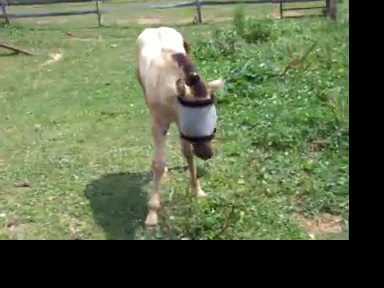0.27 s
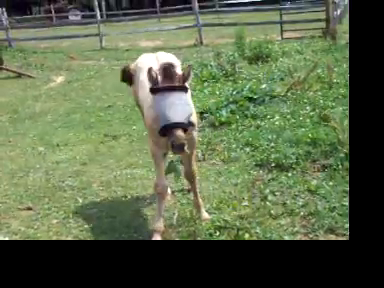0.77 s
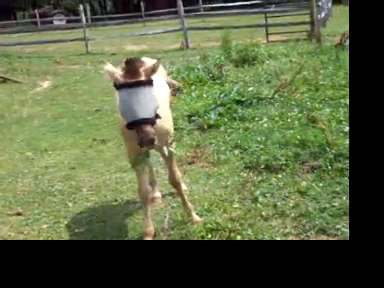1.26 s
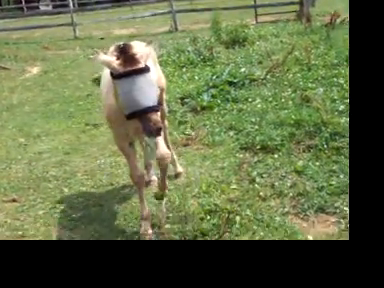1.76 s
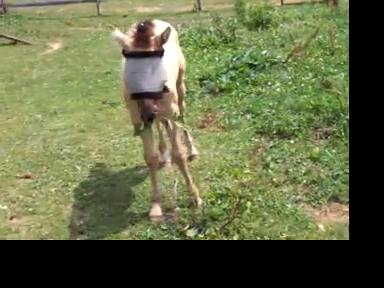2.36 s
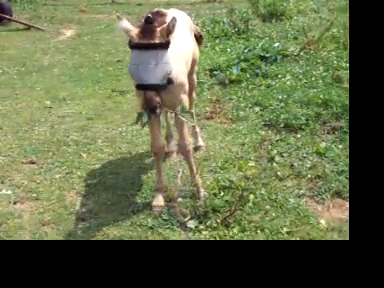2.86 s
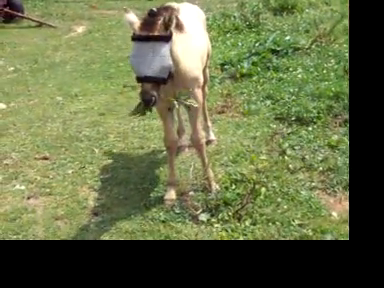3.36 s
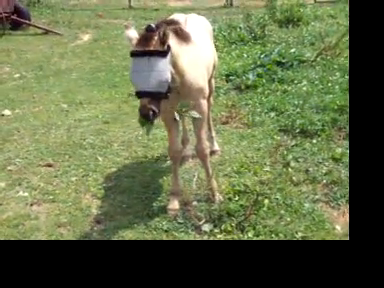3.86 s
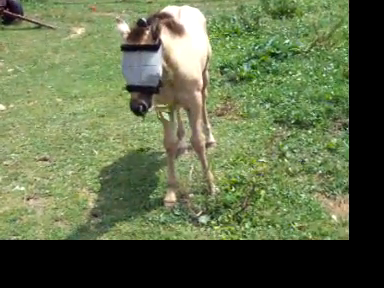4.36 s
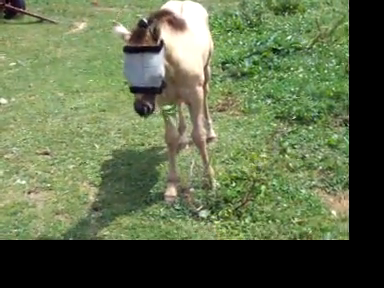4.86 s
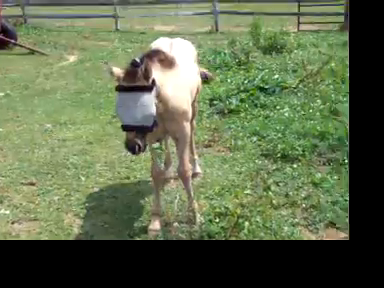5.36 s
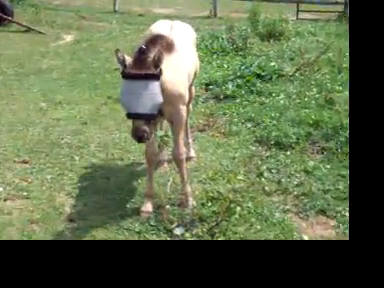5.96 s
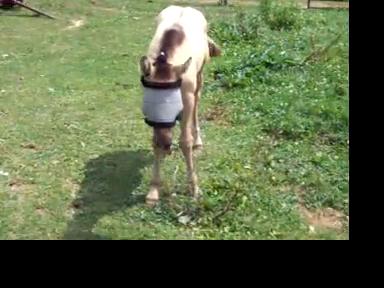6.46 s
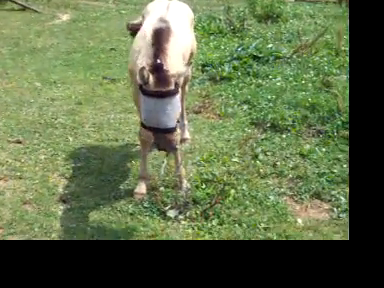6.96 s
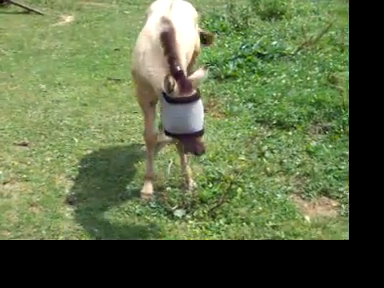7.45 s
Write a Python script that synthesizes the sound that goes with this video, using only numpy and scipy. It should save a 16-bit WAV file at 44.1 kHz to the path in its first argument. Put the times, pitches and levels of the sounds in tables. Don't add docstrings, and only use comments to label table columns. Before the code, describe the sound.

From the start, a camera's focus motor chatters right at the microphone: short rattling stepped buzzes ending in tiny clacks and thumps, in quick groups until about 0.9 s and again from 1.2 to 2.1 s, where a soft gear whirr from the zoom swells and fades. Small finger ticks follow, while leaves crackle faintly and birds give brief whistles and low coos around 2.5 to 3.2 s. The motor hunts once more at 3.4 to 3.7 s. A hard bright knock lands at 4.2 s, with a quiet bird trill from 4.3 to 4.8 s. Ticks and rustle gather near 5.4 s, then gripped plastic crunches loudly at 5.6 to 5.8 s. A fuller knock with a bounce comes at 6.0 s, scattered taps after, and a double tap at 7.2 s amid bird chirps. Thin insect tones, distant engine drone, ground rumble and air hiss continue to 7.7 s.

```python
import sys
import numpy as np
from scipy import signal
from scipy.fft import rfft, irfft, next_fast_len
from scipy.io import wavfile
from scipy.ndimage import uniform_filter1d

SR = 44100
rng = np.random.default_rng(int(sys.argv[2]) if len(sys.argv) > 2 else 0)


def gain_from_decibels(decibels):
    exponent = np.asarray(decibels, float) / 20
    return 10 ** exponent


def transcribe(signal):
    frames = np.atleast_2d(signal).T
    limited = np.clip(frames, -1, 1)
    pcm = np.round(limited * 32767).astype(np.int16)
    wavfile.write(sys.argv[1], SR, pcm)


N = 340893

# pitch in Hz, level in dB, time to die by 60 dB in seconds.
CASE_RINGS = [(381.3, -23.5, 0.29), (494, -20, 0.02), (568, -8.5, 0.051), (680, -15, 0.013),
              (910, -5.5, 0.015), (1033, -3, 0.025), (1250, -7.5, 0.012), (1560, -12.5, 0.011),
              (1835, -16, 0.01), (2157, -21, 0.028), (2450, -21, 0.025), (2730, -16, 0.0059),
              (3000, -21, 0.023), (3580, -17.5, 0.0083), (3950, -21, 0.018), (4460, -22, 0.01),
              (5770, -16, 0.012)]


def focus_motor(moves, lead_s, first_db, last_db, count):
    steps_per_s = 487.4
    start_s, peak_db, clack_db, thump_db = np.transpose(moves)[:, :, None]
    step = np.arange(count)
    at = np.round((start_s - lead_s + step / steps_per_s) * SR).astype(int)
    speeding_db = first_db * np.clip(1 - step / 3.34, 0, 1)
    speeding_db = speeding_db + last_db * np.clip(step / 3.28 - 1, 0, None)

    moving = np.zeros(N)
    moving[at] = gain_from_decibels(peak_db + 0.19 * speeding_db)
    rattle = uniform_filter1d(moving, size=100) * rng.standard_normal(N)
    out = gain_from_decibels(25.0) * band(rattle, 740, 6600)
    for k, (hz, level_db, t60) in enumerate(CASE_RINGS):
        heavy = np.clip(1.3 - hz / 4000, 0, 1)
        uneven_db = 2.0 * rng.standard_normal(at.shape)
        steps = np.zeros(N)
        steps[at] = gain_from_decibels(peak_db + heavy * speeding_db + uneven_db)
        rattle_db = 13.5 + 5.6 * (hz > 1200)
        out += gain_from_decibels(level_db) * ring((-1) ** k * steps + gain_from_decibels(rattle_db) * rattle, hz, t60)

    clacks, thumps = np.zeros((2, N))
    last = at[:, -1]
    clacks[last] = gain_from_decibels(peak_db + clack_db + 8.0)[:, 0]
    thumps[last] = gain_from_decibels(peak_db + thump_db + 7.0)[:, 0]
    clack = ring(clacks, 3840, 0.01) + 0.36 * ring(clacks, 2600, 0.0037) + 0.65 * ring(clacks, 1300, 0.004)
    thump = ring(thumps, 567, 0.046) + 0.14 * ring(thumps, 1015, 0.055) - 0.12 * ring(thumps, 400, 0.15)
    return out + clack + thump


# start of the first move in seconds, level above usual in dB.
HUNTS = [(0.114, -0.5), (0.364, 0.8), (0.614, 0.8), (1.313, 0.5), (1.611, 0.5), (1.861, 0.2), (3.459, .5)]
# seconds after the hunt starts, peak in dB, end-stop clack in dB, thump in dB.
SHORT_MOVES = [
    (0, -21, -13, -12),
    (.05, -23, -23, -5),
    (.1, -21, -16, -13),
]
LONG_MOVE = (.181, -22, -20, -13)
# start in seconds, peak in dB, clack in dB, thump in dB.
WAKE_MOVES = [
    (1.243, -23.5, -32, -8),
    (3.389, -23.5, -21, -8.5),
]
# start in seconds, peak in dB, clack in dB, thump in dB.
FIRST_MOVE = [(0.044, -22.5, -7, -11)]


def focus_hunts():
    short = focus_motor(sorted(hunted(SHORT_MOVES) + WAKE_MOVES), 0.0068, first_db=-27.0, last_db=-2.0, count=5)
    long = focus_motor(hunted([LONG_MOVE]), 0.008, first_db=-29.0, last_db=-3.5, count=10)
    first = focus_motor(FIRST_MOVE, 0.0053, first_db=-28, last_db=-11, count=13)
    return short + long + first


def hunted(moves):
    return [(s + after, db + peak_db, clack_db, thump_db)
            for s, db in HUNTS
            for after, peak_db, clack_db, thump_db in moves]


# time in seconds, level in dB.
ZOOM_LEVEL = [(1.42, -56), (1.58, -47), (1.66, -45), (1.74, -46), (1.84, -48), (1.97, -50), (2.14, -57.5),
              (2.25, -66)]
# pitch in Hz, level in dB per Hz.
ZOOM_COLOUR = [(150, -31), (250, -8.5), (636, -4), (853, -16.5), (2560, -12), (2720, -20), (5010, -22.5),
               (7000, -31), (9100, -54), (15400, -120)]
# pitch in Hz, width in Hz, level in dB.
ZOOM_GEARS = [(1225, 190, -4), (1570, 180, -4.5), (2418, 69, -8.5), (5000, 190, -10.5), (5840, 160, -17)]


def zoom_motor():
    white = rng.standard_normal(N)
    gears = sum(gain_from_decibels(db) * narrow_noise(hz, width_hz, white) for hz, width_hz, db in ZOOM_GEARS)
    whirr = coloured(white, ZOOM_COLOUR) + gears
    level_db = in_time(ZOOM_LEVEL, outside=-120)[0] + 5.0
    return gain_from_decibels(level_db + 0.83 * drift(30)) * whirr


# time in seconds, peak in dB, delay of the bounce in seconds, bounce in dB.
KNOCKS = [
    (4.179, -8, 0.003, -29),
    (6.0232, -11.5, 0.00128, -7),
    (7.2441, -24.5, 0.001175, 7),
    (6.8433, -24, .002, 0),
    (6.0697, -29, .001, -14),
    (2.4686, -27.5, 0.00146, -1),
]
# pitch in Hz, level in dB, time to die by 60 dB in seconds.
KNOCK_RINGS = [
    [(700, -17.5, 0.013), (1810, -13, 0.018), (2390, -11.5, 0.016), (3100, -8.5, 0.011),
     (3600, -9.5, 0.015), (4020, -2, 0.0076), (5400, 1, 0.0058), (6000, -2.5, 0.0067), (6660, -1.5, 0.0068)],
    [(680, -4, 0.018), (1240, -4, 0.012), (1940, -3.5, 0.012), (2600, -2.5, 0.014), (3400, -3.5, 0.01),
     (4230, 1.5, 0.009), (5200, -10, 0.0073), (6040, -16, .008)],
    [(955, -2.5, 0.012), (2010, -0.5, 0.016), (2830, -7, 0.014), (3380, -8, 0.011), (4040, -3, 0.011),
     (4640, -8, .01), (6880, -13, .008)],
    [(1640, -8, 0.014), (2530, -13, .012), (3200, -3, 0.011), (4250, -0.5, 0.006), (5350, -2, .008),
     (6900, -9, 0.0063)],
    [(3300, -9, 0.0056), (4600, -4, 0.0046), (5800, -5, .005), (6900, -8, .005)],
    [(1650, -12, .012), (2750, 0, 0.011), (3600, -1.5, 0.011), (4260, -0.5, 0.011), (5400, -7, .008)],
]


def knocks():
    out = np.zeros(N)
    for (s, peak_db, bounce_s, bounce_db), rings in zip(KNOCKS, KNOCK_RINGS):
        contact = np.zeros(N)
        contact[round(s * SR)] = gain_from_decibels(peak_db - 2.5)
        contact[round((s + bounce_s) * SR)] = -gain_from_decibels(peak_db + bounce_db - 7.0)
        for k, (hz, db, t60) in enumerate(rings):
            out += (-1) ** k * gain_from_decibels(db) * ring(contact, hz, t60)
    return band(band(out, 200, 7300), 200, 7600)


# time in seconds, peak in dB, main ring in Hz.
DULL_TICKS = [(0.6334, -31, 2380), (1.0306, -42, 3350), (1.8804, -42, 2450), (3.6853, -37, 3700),
              (4.989, -31.5, 3700), (5.5513, -26.5, 900), (5.554, -28, 3200), (6.4385, -34, 5500),
              (6.458, -40, 5800), (6.785, -42, 2900), (3.715, -35, 2400), (2.445, -36, 2500),
              (5.435, -30, 5200), (6.0452, -32, 1970), (6.384, -37, 1570), (6.5844, -34, 1930),
              (7.0263, -32, 3430)]
# time in seconds, peak in dB, main ring in Hz.
DRY_TICKS = [(1.1029, -37, 3400), (2.0872, -31, 1460), (2.1675, -33, 1840), (2.6608, -31, 1540),
             (5.172, -34, 2550), (5.242, -38, 3600), (6.0275, -31, 1900), (6.04, -35, 4500),
             (6.754, -42, 2500), (4.3325, -33, 2730), (4.8913, -29, 3300), (5.6122, -23, 1900),
             (5.9648, -34, 2030), (7.2464, -19, 1980), (3.2116, -35, 3220), (7.3218, -33, 4770),
             (7.3894, -39, 3300)]
# time in seconds, peak in dB, main ring in Hz.
BRIGHT_TICKS = [
    (5.451, -19.5, 4500),
    (6.8695, -45, 6000),
    (3.4, -42, 5500),
]
# time in seconds, peak in dB, main ring in Hz.
THIN_TICKS = [
    (3.199, -33.5, 6450),
    (5.3743, -34, 6800),
]
# time in seconds, peak in dB, main ring in Hz, bright part in dB.
SLIPS = [(5.6366, -13, 2600, -6), (5.6405, -13.5, 1940, -18), (5.6481, -5.5, 1680, -23),
         (5.653, -18, 1760, -17), (5.6573, -24, 3000, -13), (5.66, -17, 5000, -9), (5.684, -31, 4000, -6),
         (5.7057, -23, 6900, 5), (5.7079, -26, 3400, -15), (5.7102, -25, 4500, -11),
         (5.7122, -6, 5240, -13), (5.715, -5.5, 1160, -26), (5.7171, -20, 940, -23),
         (5.7204, -7, 2630, -25), (5.7232, -17, 3400, -20), (5.7257, -4, 3340, -34),
         (5.727, -11.5, 1070, -22), (5.7317, -17, 3500, -12), (5.7341, -4.5, 3270, -24),
         (5.7377, -8, 1260, -28), (5.7391, -16, 3380, -25), (5.7423, -13, 2450, -23),
         (5.7449, -16, 2700, -23), (5.7462, -14, 3270, -25), (5.7479, -13, 2300, -16),
         (5.7497, -17, 2900, -16), (5.7532, -14, 3610, -17), (5.7559, -7.5, 2510, -16),
         (5.7585, -14, 860, -21), (5.7606, -13.5, 4040, -20), (5.7632, -14, 2710, -14),
         (5.7639, -8, 2000, -3), (5.7718, -11, 3000, -11), (5.78, -28, 3300, -29)]


def ticks():
    size = 4000
    out = np.zeros(N + size)
    kinds = [(DULL_TICKS, (-6.5, -23)), (DRY_TICKS, (-9.5, -13.5)), (BRIGHT_TICKS, (-17, -2)), (THIN_TICKS, (-27, 7.3))]
    touches = sorted((*tick, *kind) for rows, kind in kinds for tick in rows)
    touches += [(s, db - 1.5, hz, -13, edge_db + 4.5) for s, db, hz, edge_db in SLIPS]
    noises = rng.standard_normal((len(touches), size))
    for (s, peak_db, hz, low_db, high_db), white in zip(touches, noises):
        t60 = 0.014 * gain_from_decibels(-0.39 * (peak_db + 30))
        puff = white * gain_from_decibels(-60 * np.arange(size) / SR / max(t60, .003))
        puff[0] = 2.5 * np.sign(puff[0])
        middle = 0.72 * peak_one(ring(puff, hz, .0045)) + 0.73 * peak_one(band(puff, 1400, 5200))
        low = peak_one(ring(puff, 865, 0.016) + ring(puff, 1084, 0.017))
        high = peak_one(band(puff, 6240, 7320))
        tick = middle + gain_from_decibels(low_db - 0.5) * low + gain_from_decibels(high_db - 2.5) * high
        out[round(s * SR):][:size] += gain_from_decibels(peak_db) * tick
    return out[:N]


# start in seconds, hold in seconds, level in dB, low part in dB.
CRUNCH = [
    (5.636, 0.01, -23, -21),
    (5.657, 0.005, -28.5, -3),
    (5.67, 0.034, -33.5, -16),
    (5.707, 0.0043, -23, -10),
    (5.711, 0.0095, -23.5, -5.5),
    (5.717, 0.017, -12, -23),
    (5.742, 0.019, -18.5, -14.5),
    (5.767, .003, -23.5, -0.5),
    (5.778, .003, -35.5, 3.5),
]
# pitch in Hz, level in dB per Hz.
CRUNCH_COLOUR = [(710, -24.5), (1200, 8.5), (1570, -8.5), (2080, -0.5), (2810, -3.5), (4160, 1),
                 (6100, -11.5), (8800, -40), (11400, -72), (19400, -120)]


def crunch():
    rise, skin_fall, shell_fall = 5000, 1200, 800
    skin_rows = [(s, hold, db) for s, hold, db, low_db in CRUNCH]
    shell_rows = [(s, hold, db + low_db) for s, hold, db, low_db in CRUNCH]
    skin_db = bursts(skin_rows, rise, skin_fall, -93.5)
    shell_db = bursts(shell_rows, rise, shell_fall, -97)
    slips = grains(3500, spread_db=3.3)
    shell = rms_one(ring(slips, 560, 0.0082) + ring(slips, 780, 0.019) + ring(slips, 1200, 0.0049))
    return gain_from_decibels(skin_db - 5.5) * coloured(slips, CRUNCH_COLOUR) + gain_from_decibels(shell_db) * shell


# start in seconds, hold in seconds, level in dB.
STIRS = [(1.98, 0.024, -48), (2.04, 0.0051, -54), (2.16, 0.053, -56.5), (2.38, .08, -59),
         (2.54, 0.042, -56), (2.7, 0.4, -57), (3.315, 0.0072, -48.5), (3.372, 0.011, -46.5),
         (3.52, .02, -53), (3.585, 0.04, -53.5), (3.683, 0.0091, -48.5), (3.72, 0.17, -53.5),
         (3.972, 0.012, -51), (4.02, 0.056, -48), (4.286, 0.049, -50), (4.15, 0.065, -55),
         (4.616, .38, -56), (5.1, 0.084, -57), (5.22, 0.05, -55.5), (5.295, 0.035, -50),
         (5.373, 0.0093, -44), (5.42, 0.062, -47), (5.5, 0.047, -54), (5.83, 0.087, -54.5),
         (5.95, 0.044, -57.5), (6.14, 0.012, -56.5), (6.4, 0.1, -57.5)]
# start in seconds, hold in seconds, level in dB.
DRY_STIRS = [(1.98, .04, -58), (3.32, .02, -63), (3.37, 0.037, -62), (3.685, 0.014, -58), (3.75, .13, -61),
             (4.03, 0.026, -67), (4.29, 0.092, -67), (5.38, .011, -54), (5.44, 0.043, -52.5),
             (6.405, 0.071, -57.5), (6.48, .05, -58.5), (6.87, .005, -67)]
# pitch in Hz, level in dB per Hz.
LEAF_COLOUR = [(530, -44.5), (900, -17.5), (1360, -10.5), (1510, -9.5), (2470, -7), (4260, 2.5),
               (7550, -13.5), (8800, -41.5), (11400, -64.5), (19400, -120)]


def rustle():
    rise, fall = 800, 320
    clumps_db = 1.5 * drift(40)
    crackle = coloured(grains(6000, spread_db=2.0), LEAF_COLOUR)
    hiss = rms_one(band(grains(9000, spread_db=3.5), 4700, 7050))
    hiss_db = bursts(DRY_STIRS, rise, fall, -81.0) + clumps_db
    crackle_db = bursts(STIRS, rise, fall, -60.5) + 4.5 + clumps_db
    return gain_from_decibels(hiss_db) * hiss + gain_from_decibels(crackle_db) * crackle


# start in seconds, length in seconds, middle pitch in Hz, level in dB.
HOOKS = [(0.478, .07, 3560, -55), (2.515, .095, 3480, -56)]
ARCHES = [(4.797, .072, 3740, -54), (7.115, .088, 3700, -53.5)]
COOS = [(2.595, 0.16, 1503, -61.5), (3.085, 0.157, 1490, -58.5)]
RISES = [(2.763, 0.018, 5200, -54.5), (2.808, 0.016, 3600, -55), (2.833, 0.02, 4800, -55),
         (3.905, 0.012, 4500, -57), (5.296, 0.019, 5000, -53), (7.302, 0.023, 4220, -52.5)]
FALLS = [(1.098, 0.011, 3640, -52), (3.735, 0.0064, 3500, -55), (3.779, .01, 3400, -53),
         (3.835, .014, 2760, -54), (3.877, 0.019, 3500, -57), (4.886, 0.023, 3220, -53),
         (5.313, 0.011, 5100, -56)]
FLICK_UP = [(7.249, .0125, 5300, -51)]
FLICK_DOWN = [(7.2605, .014, 4950, -52)]
PIPS = [(2.786, .06, 3350, -57), (2.775, .05, 5800, -63)]
CHURRS = [(1.135, 0.031, 3400, -50.5), (7.317, 0.011, 4970, -44.5)]
# start in seconds, level in dB.
TRILL = [(4.326, -52), (4.432, -51), (4.54, -52.5), (4.649, -50.5), (4.763, -48)]
# start in seconds, level in dB.
SLOW_PHRASES = [(3.961, -53.5), (4.105, -55), (4.248, -56)]


def song():
    def phrase(beats, after_s, length, hz, louder_db):
        return [(s + after_s, length, hz, db + louder_db) for s, db in beats]
    falls = FALLS + phrase(SLOW_PHRASES, .026, .011, 2610, 0) + phrase(TRILL, -.002, .026, 3250, 0)
    pips = PIPS + phrase(TRILL[:-1], .064, .013, 2510, -6.5)
    churrs = CHURRS + phrase(SLOW_PHRASES, 0, .023, 2980, 0)
    # glide in Hz per second, share by which the ends sag, warble in Hz
    shapes = [(HOOKS, (9500, .17, 30)), (ARCHES, (2000, .25, 10)), (COOS, (600, .09, 40)),
              (FLICK_UP, (110000, .0, 10)), (FLICK_DOWN, (-155000, .0, 10)), (RISES, (62000, .01, 10)),
              (falls, (-58000, .005, 10)), (pips, (500, .02, 30)), (churrs, (-3000, .02, 170))]
    return [(*note, *shape) for notes, shape in shapes for note in notes]


def birds():
    warbles_per_s, swell_db = 120, 1.5
    dry = np.zeros(N)
    for start, length, middle_hz, db, glide, sag, warble_hz in song():
        u = np.linspace(-1, 1, round(length * SR))
        hz = middle_hz * (1 - sag * u ** 2) + glide * length / 2 * u
        hz = hz + warble_hz * np.sin(np.pi * warbles_per_s * length * u)
        whistle = np.sin(2 * np.pi * np.cumsum(hz) / SR)
        loudness = gain_from_decibels(db + 9.0 + swell_db * u) * (1 - u ** 2) ** 0.62
        dry[round(start * SR):][:len(u)] += loudness * whistle
    dry = dry * gain_from_decibels(2.8 * drift(90))
    tail = rng.standard_normal(SR // 2) * gain_from_decibels(-60 * np.arange(SR // 2) / SR / .5)
    tail = tail / np.sqrt(np.sum(tail ** 2))
    return dry + gain_from_decibels(-4.0) * signal.fftconvolve(dry, tail)[:N]


# start in seconds, end
# in seconds, pitch in Hz, width in Hz.
FAR_LINES = [(-.3, .4, 4250, 120), (.4, .95, 4600, 70), (.55, .82, 3700, 80), (.75, 1.5, 3350, 90),
             (1.12, 1.185, 3400, 450), (2.06, 2.14, 1500, 150), (2.78, 2.9, 4200, 1800),
             (2.81, 2.9, 3400, 200), (5.285, 5.33, 1300, 1200), (5.4, 5.49, 1000, 1000),
             (6.2, 6.62, 4800, 600), (6.5, 8.4, 4800, 550), (6.1, 7.9, 1500, 500), (7.44, 7.62, 1500, 70),
             (7.31, 7.4, 4900, 900), (.334, .351, 2300, 2200), (1.267, 1.287, 3400, 2200),
             (1.467, 1.48, 4200, 700), (1.632, 1.645, 3500, 1400), (2.655, 2.695, 2100, 1500),
             (2.742, 2.756, 4100, 1400), (2.908, 2.936, 3900, 1600), (6.95, 7.12, 1480, 150)]
FAR_LINES_DB = [-53.5, -64.5, -58, -57, -43, -52.5, -58, -55, -46, -49, -75, -56.5, -57, -56.5, -54, -44,
                -42, -48, -41.5, -50, -46.5, -49.5, -64]


def far_lines():
    out = np.zeros(N)
    white = rng.standard_normal(N)
    flutter = gain_from_decibels(1.8 * drift(39))
    time = np.arange(N) / SR
    for (start, end, hz, width_hz), db in zip(FAR_LINES, FAR_LINES_DB):
        inside = (time > start) & (time < end)
        arch = np.sin(np.pi * (time[inside] - start) / (end - start)) ** 0.21
        out[inside] += gain_from_decibels(db) * arch * narrow_noise(hz, width_hz, white[inside])
    return flutter * out


# time in seconds, level in dB.
DRONE_LEVEL = [(0, -41), (1.16, -37.5), (1.42, -43), (1.53, -35), (1.85, -40), (2.2, -55), (2.63, -42.5),
               (3.25, -46.5), (3.95, -52), (4.1, -54), (5.4, -52.5), (5.77, -42.5), (5.9, -49), (6.7, -52),
               (7.73, -54)]
# time in seconds, level in dB.
BREEZE_LEVEL = [(0, -46.5), (.8, -51), (1.3, -48.5), (2.2, -52), (3.3, -52), (4.4, -51.5), (5.2, -51),
                (5.9, -50.5), (6.3, -49), (7.0, -48), (7.73, -48)]
# pitch in Hz, level in dB per Hz.
AIR_COLOUR = [(150, -29), (260, -4), (713, -10.5), (814, -13.5), (945, -13.5), (2480, -17.5), (3140, -23),
              (3430, -17.5), (3810, -27.5), (4690, -22.5), (8110, -37), (9000, -77), (11700, -84),
              (19800, -120)]
# pitch in Hz, level in dB per Hz.
RUMBLE_COLOUR = [(12, -41.5), (20, -14.5), (86, 1), (124, -5), (178, -1), (300, -12), (390, -34.5),
                 (660, -120)]
# pitch in Hz, level in dB.
WHINE = [(7950, -80), (8200, -81)]


def paddock():
    low, deep, white = rng.standard_normal((3, N))
    drone = narrow_noise(176.0, 55, low) + 0.64 * narrow_noise(210.5, 50, low)
    drone = gain_from_decibels(in_time(DRONE_LEVEL)[0] - 7.0) * drone
    rumble = gain_from_decibels(-49.5) * coloured(deep, RUMBLE_COLOUR)
    whine = sum(gain_from_decibels(db) * narrow_noise(hz, 40, white) for hz, db in WHINE)
    air = gain_from_decibels(in_time(BREEZE_LEVEL)[0] + .5 * drift(30)) * coloured(white, AIR_COLOUR)
    return drone + rumble + air + whine


def in_time(rows, outside=None):
    s, *columns = np.transpose(rows)
    return [np.interp(np.arange(N) / SR, s, c, left=outside, right=outside) for c in columns]


def bursts(rows, rise, fall, floor_db):
    level = np.full(N, float(floor_db))
    for s, hold, db in rows:
        height = max(db - floor_db, 0)
        corners = [s - height / rise, s, s + abs(hold), s + abs(hold) + height / fall]
        at = np.arange(round(corners[0] * SR), round(corners[-1] * SR))
        burst = np.interp(at / SR, corners, [floor_db, db, db, floor_db])
        level[at] = np.maximum(level[at], burst)
    return level


def drift(rate):
    r = np.exp(-2 * np.pi * rate / SR)
    wander = signal.lfilter([1], [1, -2 * r, r * r], rng.standard_normal(N + SR))
    return rms_one(wander[SR:])


def grains(per_s, spread_db):
    sizes = gain_from_decibels(spread_db * np.minimum(rng.exponential(1, N), 4)) * rng.choice([-1, 1], N)
    return sizes * (rng.random(N) < per_s / SR)


def ring(clicks, hz, t60):
    r, w = gain_from_decibels(-60 / (t60 * SR)), 2 * np.pi * hz / SR
    return signal.lfilter([0, np.sin(w)], [1, -2 * r * np.cos(w), r * r], clicks + 1e-18)


def narrow_noise(hz, width_hz, white):
    t60 = np.log(1000) / (np.pi * width_hz)
    return rms_one(ring(ring(white, hz, t60), hz, t60))


def coloured(x, spectrum):
    hz, db = np.transpose(spectrum)
    size = next_fast_len(N)
    grid = np.maximum(np.arange(size // 2 + 1) * SR / size, 1)
    gain = gain_from_decibels(np.interp(np.log(grid), np.log(hz), db, left=-70, right=-70))
    return rms_one(irfft(rfft(x, size) * gain, size)[:N])


def band(x, low_hz, high_hz):
    return signal.sosfilt(signal.butter(3, [low_hz, high_hz], "band", fs=SR, output="sos"), x)


def rms_one(x):
    return x / np.sqrt(np.mean(x ** 2) + 1e-20)


def peak_one(x):
    return x / np.abs(x).max()


def scene():
    case = band(gain_from_decibels(-5.5) * focus_hunts() + ticks(), 190, 5500)
    camera = case + knocks() + zoom_motor() + crunch()
    surroundings = rustle() + birds() + far_lines() + paddock()
    return (camera + surroundings)[None]


def roll_off(x):
    return signal.sosfilt(signal.butter(12, 9180, fs=SR, output="sos"), x)


def record(dry):
    rounded = .47 * np.tanh(dry / .47)
    top_cut = signal.ellip(10, .5, 95, 8700, fs=SR, output="sos")
    return roll_off(signal.sosfilt(top_cut, rounded))


dry = scene()
out = record(dry)
transcribe(out)
```